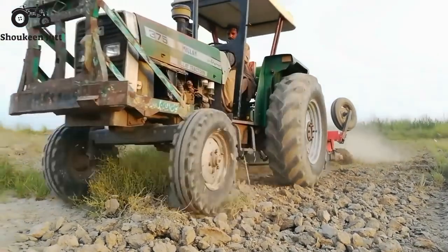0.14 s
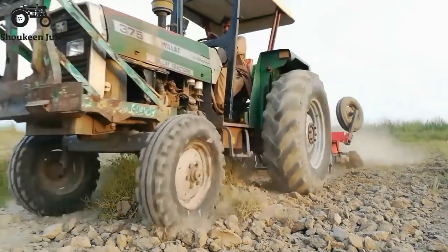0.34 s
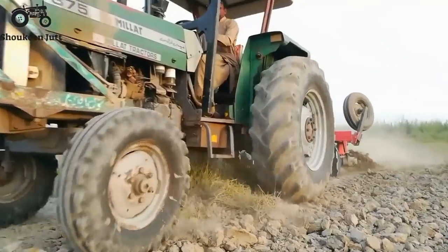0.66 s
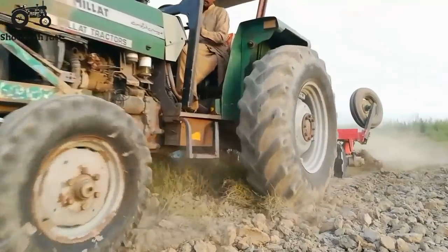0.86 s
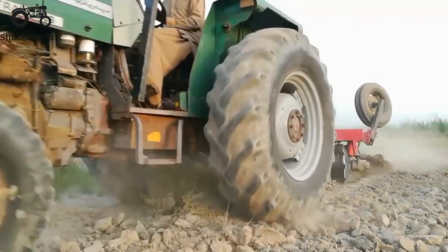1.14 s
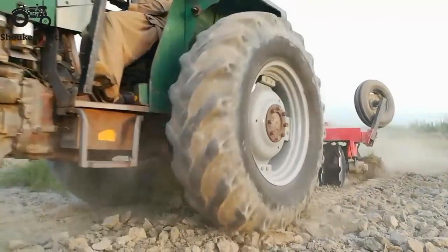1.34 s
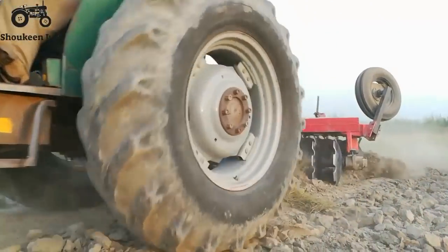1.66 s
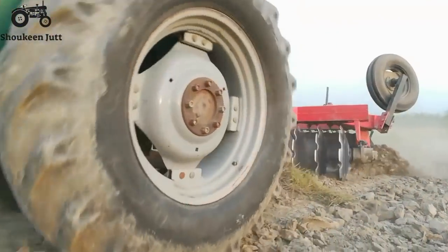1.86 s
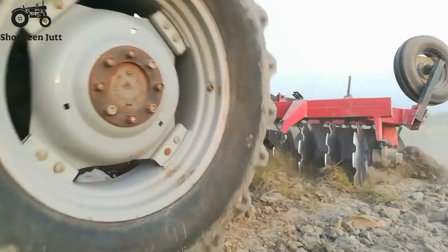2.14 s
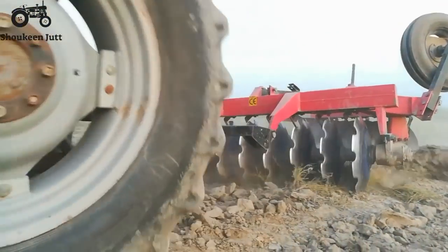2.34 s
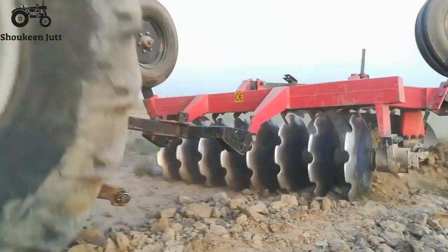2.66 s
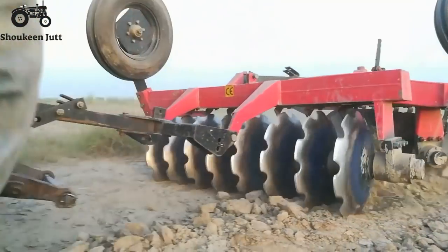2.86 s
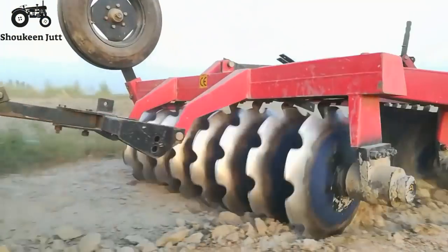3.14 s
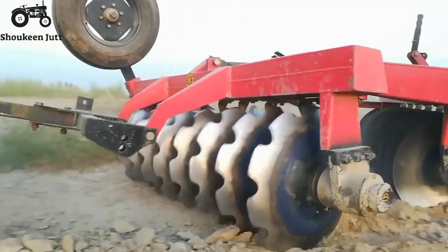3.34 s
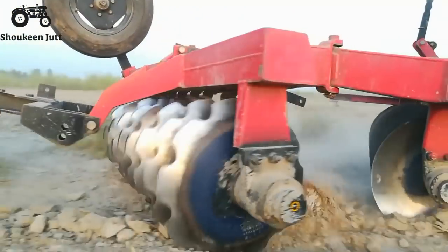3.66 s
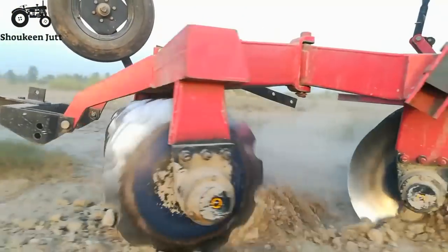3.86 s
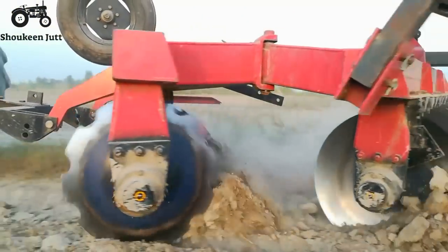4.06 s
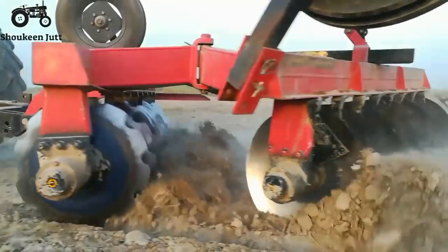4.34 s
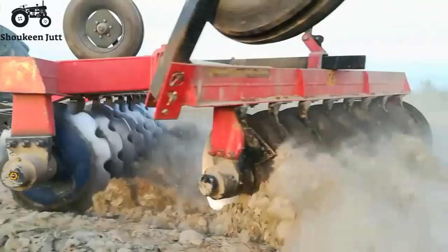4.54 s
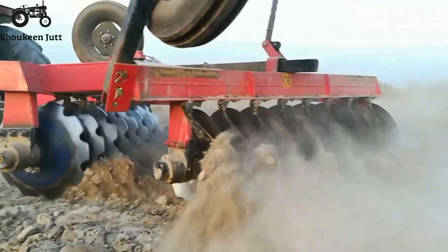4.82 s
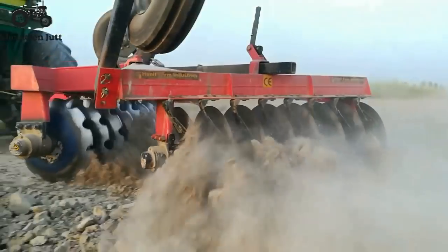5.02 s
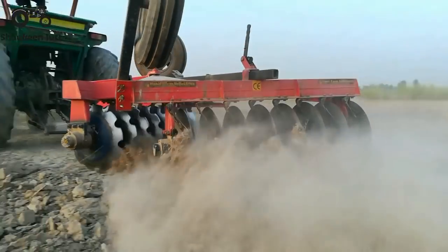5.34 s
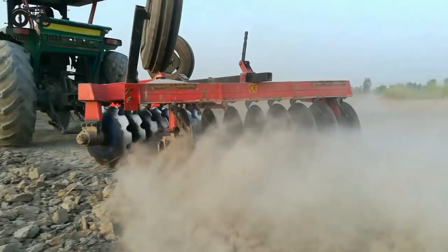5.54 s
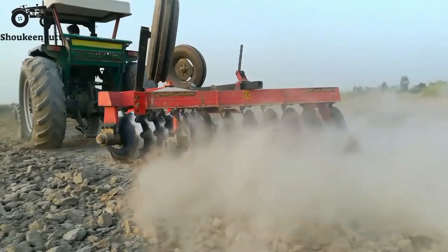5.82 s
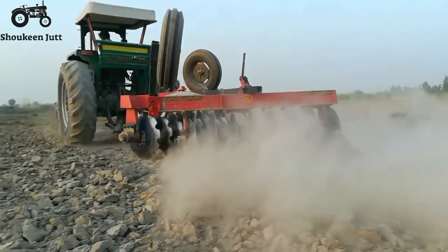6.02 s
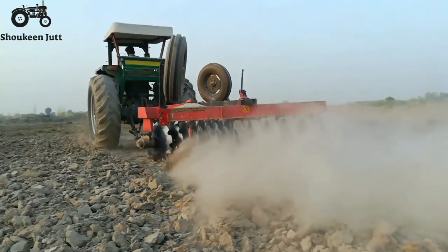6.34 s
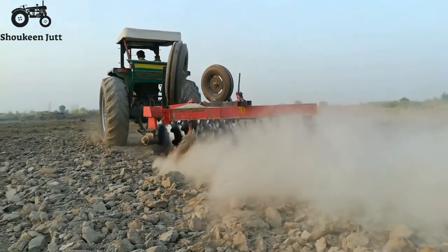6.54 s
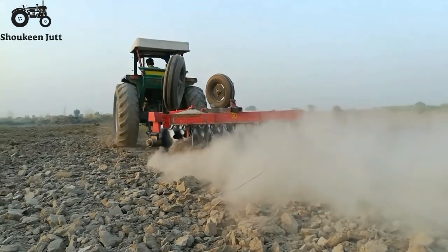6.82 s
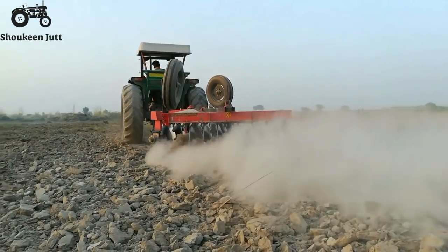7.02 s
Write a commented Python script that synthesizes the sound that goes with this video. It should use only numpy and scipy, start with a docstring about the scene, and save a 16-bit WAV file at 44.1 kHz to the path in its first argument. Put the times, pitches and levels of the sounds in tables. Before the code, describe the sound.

Open field, dry stony soil, close stereo microphone, no room echo. From 0 s a four-cylinder diesel runs at steady working speed, about 56 firings a second: low buzzing throb, hard metallic clatter, and a whine near 900 Hz, mostly left, swelling with load above a fainter, higher gear tone. The engine is nearest around 1 s, with a jolt at 0.9 and another at 1.6 as the rear wheel begins to mask it. Around 2 s the tyre crunches brittle grit, with soft thuds. At 2.67 a bright stone chink; from 2.9 discs ring, knock and scrape. Complete silence falls from 3.56 to 3.70, with abrupt edges. The harrow returns at its fullest from 3.7 to 5.2: rumbling earth, low clod thuds, grating steel, spraying grit, cracking stones. Brief thin squeaks come at 4.3 and 5.4-5.9. Engine and harrow recede, fading from 6.3 but still faintly audible at 7.2.

```python
"""On dry, stony soil a four-cylinder diesel tractor drives close by, towing a disc harrow, and moves off.
Exhaust lines, struck block panels and meshing gears all follow one wavering firing count.
Then tyre and harrow pass: noise bursts for crushed clods and grit, decaying modes for discs on stones,
sagging sines for heavy clods. A short silence splits the pass in two; the end fades."""
import sys
import numpy as np
from scipy import signal
from scipy.fft import rfft, irfft, next_fast_len
from scipy.io import wavfile
from scipy.ndimage import uniform_filter1d

SR = 44100
rng = np.random.default_rng(int(sys.argv[2]) if len(sys.argv) > 2 else 0)


def generate_wav(sig):
    """Save sig (samples, or channels by samples) to the path in sys.argv[1] as 16-bit PCM at SR."""
    pcm = np.round(np.clip(np.atleast_2d(sig).T, -1, 1) * 32767).astype(np.int16)
    wavfile.write(sys.argv[1], SR, pcm)


N = 317074
T = np.arange(N) / SR
SIZE = next_fast_len(N + 4096)
FREQS = np.maximum(np.arange(SIZE // 2 + 1) * SR / SIZE, 1)

# Half lengths below are those of a bell, out to 1/e.
# Engine speed. Each row: time in seconds, firings per second.
ENGINE_SPEED = [(0, 55.4), (.12, 55.3), (.29, 56.8), (.48, 55.45), (.68, 56.05), (.85, 56.0), (1.08, 56.8),
                (1.27, 55.85), (1.45, 55.65), (1.73, 56.5), (1.92, 55.7), (2.12, 56.0), (2.4, 55.5),
                (2.75, 55.9), (3.0, 55.5), (3.3, 57.1), (3.47, 55.75), (3.97, 57.4), (4.25, 55.65),
                (4.6, 56.05), (5.5, 55.9), (5.75, 56.6), (6.03, 54.95), (6.55, 56.6), (6.77, 54.9),
                (6.97, 56.05), (7.19, 55.0)]
START_FIRINGS = .38   # position within the first firing
# Side facing the listener. Each row: time in seconds, side (0 nose, 1 flank, 2 tail).
FACING = [(0, 0.018), (.4, 0.061), (.95, 0.48), (1.58, 0.72), (1.7, 0.86), (2.55, 1.25), (4.3, 1.535),
          (6.3, 1.68), (7.19, 1.75)]
# Positions of the three exhaust columns below on the scale of FACING.
EXHAUST_FACING = (.2, .62, 1.1)
# Exhaust lines. Each row: multiple of the firing rate, relative dB from the front, at a slant, from behind.
EXHAUST_ORDERS = [(.5, -26, -28, -23.5), (.75, -31, -32, -34), (1.25, -36, -37, -35),
                  (1.5, -36.5, -35, -32), (2, -13, -10.5, -9), (2.5, -15, -14, -14.5),
                  (3, -13.5, -18.5, -8), (3.5, -23, -28.5, -29), (4, -13, -12.5, -12.5),
                  (5, -19.5, -10.5, -11.5), (5.5, -20.5, -17.5, -28), (6, -21, -19.5, -18),
                  (6.5, -31, -25, -23), (12, -19.5, -29, -28.5), (13, -24, -29, -39.5)]
# Knock strength of each cylinder in firing order, in relative dB.
CYLINDERS_DB = [-1, 1, -1.5, 2.5]
# Clatter spectrum. Each row: frequency in Hz, relative dB at nose, flank, tail.
CLATTER_SPECTRUM = [(25, -15, -11, -8), (79.7, -4, -6, 2), (133, -2, -2.5, 5.5), (264, -5.5, -1, 1),
                    (478, -2, -3.5, -22), (766, -1.5, -3.5, -6), (1036, 5, -4, -2.5),
                    (1178, -4.5, -12.5, -10), (1480, -1.5, -7, 3.5), (2000, -10, 0, -9),
                    (2740, -7, -7.5, -16.5), (3430, -4, -10, -6), (5030, -14, -8, -16),
                    (6200, -14.5, -12.5, -17.5), (7350, -19, -19.5, -18.5), (14300, -30.5, -28.5, -41)]
# Ringing engine panels and the hollows between them.
# Each row: centre in Hz, width in Hz, change in dB at nose, flank, tail.
ENGINE_PANELS = [(365, 50, -2.5, -0.5, 5.5), (760, 78, 7, 2.5, -2), (795, 26, -21, -5.5, -3.5),
                 (1130, 50, 8, 5, -7), (1273, 90, -2.5, 1.5, 6), (1513, 250, 4, 4, -8.5),
                 (1890, 75, -5.5, -4.5, 0), (1922, 64, 12, 2.5, 9.5), (2367, 61, 8, 1.5, -16.5),
                 (2780, 150, -8, -3.5, 8.5), (3350, 98, -1, 3.5, -1.5), (3670, 160, 1.5, 4.5, -5.5),
                 (4160, 130, -8.5, 6.5, -6), (5450, 200, 5, -4, -2.5), (5830, 210, -2.5, -0.5, -11),
                 (6070, 350, 2.5, -2.5, 0), (6650, 300, 8, 3, -6), (7800, 250, -6, -2, 1)]
# Jolts over rough ground. Each row: centre in seconds, half length in seconds, rise of clatter in dB,
# rise of exhaust throb in dB.
JOLTS = [(.94, 0.031, 2, 3), (1.6, 0.018, 3, 4)]
GEAR_TEETH_PER_FIRING, TIMING_TEETH_PER_FIRING = 16, 24
# Gears take up load. Each row: centre in seconds, half length in seconds, rise of whine in dB.
GEAR_LOADS = [(.03, .07, 14), (.15, .06, 13.5), (.28, .05, 10), (.54, .14, 11.5), (.75, .16, 15.5),
              (.94, .11, 10.5), (1.05, .05, 3.5), (1.18, .07, 14), (1.32, .08, 11), (2.0, .06, 13.5),
              (2.17, .07, 11.5), (2.87, .1, 10), (3.04, .09, 14.5), (3.28, .1, 10.5), (3.46, .05, 15),
              (4.3, .08, 9.5), (4.5, .08, 12), (5.13, .1, 11), (5.42, .09, 11.5), (5.7, .12, 8),
              (6.05, .2, 11), (6.45, .17, 12.5), (6.78, .14, 12.5), (7.05, .14, 14)]
# Timing gears take up load. Each row: centre in seconds, half length in seconds, rise in dB.
TIMING_LOADS = [(.05, .13, 8), (.32, .08, 6), (.52, .07, 6), (.75, .08, 4), (1.38, .07, 7), (1.54, .06, 6)]

GROUND_SPEED_M_PER_S = 1.6
# Straight passes. Each holds: nearest moment in seconds, distance then in metres, relative level then in dB.
EXHAUST_PASS = (0.76, 1.82, -18.5)
BLOCK_PASS = (1.27, 2.54, -14.5)
GEAR_PASS = (0.76, 2.2, -37)
TIMING_PASS = (0.56, 4.3, -35.5)
CLODS_PASS = (4.25, 0.93, -25.5)
FRONT_GANG_PASS = (3.53, 0.74, -26.5)
REAR_GANG_PASS = (5, 1.08, -28)
GRIT_PASS = (5.1, 1.29, -31.5)
# Rear wheel hides the engine: midpoint in seconds, duration of the change in seconds, loss in dB.
WHEEL_SCREEN = (1.564, .08, 1)
# Harrow comes out from behind the wheel: fully out in seconds, duration in seconds, loss before in dB.
HARROW_CLEAR = (2.37, 0.84, 11)

# Clod spectrum. Each row: frequency in Hz, relative level per Hz in dB.
CLOD_SPECTRUM = [(40, -12.5), (110, -20), (170, -1.5), (290, -1), (370, 0), (480, -8), (800, -18),
                 (1500, -43)]
# Grit spectrum. Each row: frequency in Hz, relative level per Hz in dB.
GRIT_SPECTRUM = [(600, -9.5), (1000, -11), (1200, -3), (1900, 5.5), (2400, -1.5), (2900, -3), (3200, 3),
                 (3850, 4.5), (4400, 0.5), (5050, -3), (5600, -7.5), (6500, -7), (8000, -13), (15500, -21)]
# Rumble of earth turning between the discs. Each row: time in seconds, centre in Hz, dB relative to the clods.
HOLLOW = [(2.7, 176, -1), (3.4, 185, -2), (3.8, 270, -13), (4.6, 290, -8.5), (5.1, 360, -0.5),
          (5.6, 365, -3.5), (6.2, 319, -8.5), (6.5, 171.3, 0)]
# Loose earth slides off the discs. Each row: centre in seconds, half length in seconds, rise of rumble in dB.
CLOD_FALLS = [(3.52, 0.073, 0.5), (3.78, 0.087, 1), (4.05, 0.049, 5), (4.24, 0.045, 2.5),
              (4.36, 0.022, 5.5), (4.52, 0.087, 2), (4.66, 0.025, 4.5), (4.79, 0.061, 4), (5.13, 0.11, 2),
              (5.5, 0.036, 4), (5.78, 0.14, 3)]
# Stony patches drag along the discs. Each row: centre in seconds, half length in seconds,
# rise of ringing in dB, rise of grit in dB.
SCRAPES = [(2.8, 0.038, 2, -3), (2.9, 0.024, 9, 3), (3.16, 0.044, 6, 12.5), (3.28, 0.061, 5, 12),
           (3.40, 0.092, 3.5, 4.5), (3.53, 0.026, 2, 15.5), (3.77, 0.048, 2.5, 9), (3.94, 0.046, 7, 9),
           (4.05, 0.04, 7, -1), (4.47, .06, 3, 7.5), (4.59, 0.064, 3, 5), (4.72, 0.052, 1, -3.5),
           (5.0, 0.11, 1, 2.5), (5.13, 0.035, 2.5, 3), (5.4, 0.028, 7.5, 8), (5.55, 0.086, 2.5, 6.5),
           (5.76, 0.078, 4.5, 5.5), (5.96, 0.074, 2.5, 8.5), (6.15, 0.022, 5.5, 5.5), (6.22, 0.033, 7, 6),
           (6.33, 0.025, 8.5, 5.5), (6.47, 0.018, 2, 4), (6.54, .02, 6.5, 1), (6.9, .025, 3, 4)]
# Ringing of the disc rims. Each row: time in seconds, centre in Hz, relative level in dB.
RIM_RINGING = [(3.0, 1580, -7), (3.4, 1520, -8), (3.8, 1470, -8.5), (4.6, 1550, -5.5), (5.0, 1510, -9),
               (5.25, 1400, -7), (5.8, 1420, -9), (6.4, 1440, -7.5)]
# The rear gang takes over. Each row: time in seconds, its share 0-1.
REAR_GANG_SHARE = [(4.4, 0), (5.3, 0.92)]
# Steel discs and frame. Each row: mode in Hz, relative dB in the front gang, in the rear gang, t60 in seconds.
DISC_MODES = [(490, -8.5, -26.5, .05), (922, 1, -4.5, 0.058), (1048, 4.5, -25, 0.027),
              (1310, -9.5, -10, 0.1), (1351, -5, 2, 0.084), (1416, 2.5, -7.5, 0.074),
              (1494, -20, 0.5, 0.091), (1529, 0.5, 3, 0.072), (1632, 5, -18.5, 0.045),
              (1797, 1, 1.5, 0.034), (1890, -8, -2.5, 0.1), (2143, -11.5, -6.5, 0.062),
              (2510, -8.5, -7, 0.065), (3160, -11.5, -5.5, 0.14), (3584, -7, -5.5, 0.11),
              (3860, -15, -5.5, .04), (4040, -24, -6, 0.047), (4500, -11.5, -7.5, .04),
              (4640, -8, -7.5, .04), (4970, -11, -8.5, 0.043)]
# Discs hit large stones. Each row: start in seconds, relative level in dB.
STONE_KNOCKS = [(2.899, -6.5), (3.079, -11), (3.1173, -2.5), (3.258, -12), (3.296, -18), (3.3344, -7.5),
                (3.3831, -7), (3.4718, -14.5), (3.757, -8), (4.015, -15), (4.03, -16), (4.057, -7.5),
                (4.184, -9.5), (4.35, -9.5), (4.5384, -13.5), (4.6034, -15), (4.8628, -12), (4.9167, -20),
                (5.011, -13), (5.0699, -9), (5.1393, -13), (5.225, -11), (5.3862, -15), (5.4874, -11.5),
                (5.5956, -18.5), (5.881, -14.5), (6.0616, -12), (6.1768, -16)]
# Rear tyre rolls by: nearest moment in seconds, half length in seconds, relative level in dB.
TYRE_CRUNCH = (1.95, .6, -31)
# Tyre crunch spectrum. Each row: frequency in Hz, relative level per Hz in dB.
CRUNCH_SPECTRUM = [(1000, -20), (2050, 2), (2800, -17), (4400, -4), (5000, 5), (5500, 9), (5950, -12),
                   (6650, 1), (7400, -8), (15000, -18)]
# Heavy clods land or burst under a wheel. Each row: start in seconds, relative level in dB, settled pitch in Hz.
CLOD_THUDS = [(1.598, -18, 152), (2.099, -18, 179), (2.37, -18.5, 185), (3.747, -25, 288),
              (3.778, -20, 190), (3.905, -23, 235), (3.998, -19.5, 223), (4.048, -15.5, 318),
              (4.08, -24, 198), (4.23, -19.5, 262), (4.302, -22, 276), (4.343, -25, 339), (4.466, -23, 221),
              (4.648, -19, 268), (4.737, -18, 320), (4.849, -18, 252), (4.933, -19, 285),
              (5.006, -17.5, 355), (5.091, -18.5, 318), (5.134, -18, 347), (5.183, -18, 205),
              (5.782, -23, 166), (6.643, -24, 196)]
# A stone skips along the drawbar. Each row: touch in seconds, relative level in dB.
DRAWBAR_TOUCHES = [(2.6667, -0.5), (2.668, -2), (2.672, -1), (2.6775, -4), (2.683, -5)]
# Drawbar modes. Each row: frequency in Hz, relative level in dB, t60 in seconds.
DRAWBAR_MODES = [(3120, 4, 0.023), (4620, 0, .025), (6300, 0.5, 0.027), (6900, 0.5, .03),
                 (7350, -0.5, .025), (7900, -4, .02), (8450, -1.5, 0.034), (9300, -6, .02)]
# Stones crack or are flicked aside. Each row: start in seconds, relative level in dB, centre in Hz, t60 in seconds.
STONE_CRACKS = [(2.668, -25, 7400, 0.06), (2.667, -22, 3600, .04), (2.898, -20.5, 1900, .06),
                (3.119, -19.5, 1920, 0.06), (3.379, -26, 6200, .06), (4.404, -29, 6990, 0.041),
                (4.537, -31, 6850, 0.054), (5.079, -25, 4500, 0.098), (5.366, -23.5, 3860, 0.05),
                (5.752, -27, 3700, .06), (5.918, -27, 3300, 0.076), (6.013, -30, 3300, .07),
                (6.207, -34, 3870, .05), (6.267, -27, 3400, .04)]
# Thin steel squeaks. Each row: centre in seconds, half length in seconds, pitch in Hz, level in dB.
SQUEAKS = [(4.305, .035, 3590, -35), (5.37, .02, 3580, -30), (5.49, .03, 3580, -33), (5.57, .04, 3590, -29),
           (5.76, .04, 3620, -34), (5.85, .022, 12500, -46)]

# Two microphone ports. Each row: frequency in Hz, left-right likeness 0-1, left minus right in dB,
# left lead in ms at off_axis 1.
PORTS = [(100, 0.93, -1, 0.77), (336, 0.89, 1, 0.75), (495, 0.83, 4, 0.76), (683, 1, 9, 0.62),
         (920, 0.59, 9.5, 0.65), (1170, 0.99, 3.5, 0.69), (1450, 0.435, 4.5, 0.63), (1875, 0.42, 7, 0.39),
         (2140, 0.33, 4.5, 0.49), (2720, 0.12, -1.5, 0.54), (3580, 0.36, 1.5, 0.593),
         (4560, 0.3, 12.5, 0.619), (5530, 0.073, 2.5, 0.558), (6100, .1, 5.5, 0.562),
         (8100, 0.12, -0.5, 0.57), (14900, 0.054, -1.5, 0.55)]
# Silence: start in seconds, end in seconds.
SILENCE = (3.563, 3.700)
CUTOFF_HZ = 15900
FADE_END_S, FADE_S = 7.61, 1.27   # when the fade would reach silence, its full length


def from_db(db):
    """Decibels to gain."""
    return 10 ** (np.asarray(db) / 20)


def rms_one(x):
    """Scale to rms 1."""
    return x / np.sqrt(np.mean(x ** 2) + 1e-20)


def in_time(rows):
    """Each column of a curve at every sample."""
    s, *columns = np.transpose(rows)
    return [np.interp(T, s, c) for c in columns]


def in_frequency(rows):
    """Each column of a spectrum at every frequency, interpolated over log Hz."""
    hz, *columns = np.transpose(rows)
    return [np.interp(np.log(FREQS), np.log(hz), c) for c in columns]


def coloured(x, curve_db):
    """Give a sound a spectrum; rms 1."""
    return rms_one(irfft(rfft(x, SIZE) * from_db(curve_db), SIZE)[..., :N])


def lowpass_db(corner_hz):
    """Smooth roll-off in dB for slow random signals."""
    return -20 * np.log10(1 + (FREQS / corner_hz) ** 2)


def drift(corner_hz):
    """Slow random wander of rms 1."""
    return coloured(rng.standard_normal(N), lowpass_db(corner_hz))


def decay(clicks, t60_s):
    """Each click leaves an exponential tail."""
    return signal.lfilter([1], [1, -from_db(-60 / (t60_s * SR))], clicks + 1e-18)


def ring(clicks, hz, t60_s):
    """Two-pole resonator: a unit click starts a dying sine of height 1."""
    r = from_db(-60 / (t60_s * SR))
    w = 2 * np.pi * hz / SR
    return signal.lfilter([0, np.sin(w)], [1, -2 * r * np.cos(w), r * r], clicks + 1e-18)


def grains(per_s, spread_db):
    """Random contacts of uneven strength."""
    contacts = rng.random(N) < per_s / SR
    return contacts * from_db(spread_db * np.minimum(rng.exponential(1, N), 4))


def passing(nearest_s, distance_m, level_db):
    """Level in dB of a part driving by in a straight line: pressure falls as one over distance."""
    along_m = GROUND_SPEED_M_PER_S * (T - nearest_s)
    return level_db - 10 * np.log10(1 + (along_m / distance_m) ** 2)


def swells(rows):
    """Bell-shaped rises in dB, one curve for each level column of the events."""
    return sum(np.outer(db, np.exp(-((T - s) / half_s) ** 2)) for s, half_s, *db in rows)


def behind_wheel():
    """Share of the engine hidden by the rear wheel, 0-1."""
    middle_s, duration_s, _ = WHEEL_SCREEN
    return np.clip((T - middle_s) / duration_s + .5, 0, 1)


def screened():
    """Change of the engine's level in dB as the rear wheel hides it."""
    return -WHEEL_SCREEN[2] * behind_wheel()


def ports(pair, off_axis):
    """Mix two unrelated versions into left and right, with likeness, balance and lead set by frequency."""
    alike, balance_db, lead_ms = in_frequency(PORTS)
    alike, tilt = np.clip(alike, 0, 1), from_db(balance_db)
    common, apart = rfft(pair, SIZE) * np.sqrt([1 + alike, 1 - alike])
    lead = np.exp(2j * np.pi * FREQS * off_axis * lead_ms / 1000)
    left = (common + apart) * tilt * lead
    right = common - apart
    return irfft(np.array([left, right]) / np.sqrt(1 + tilt ** 2), SIZE)[:, :N]


def exhaust(firings, waver_db, smear_rad):
    """Pressure pulses smeared by the silencer; unequal cylinders add lines between the harmonics."""
    level_db = passing(*EXHAUST_PASS) + screened() + swells(JOLTS)[1]
    facing, = in_time(FACING)
    out = from_db(.5 * drift(3.4)) * np.cos(2 * np.pi * firings)
    for order, *sides_db in EXHAUST_ORDERS:
        shake_rad = .12 * drift(6)
        phase = 2 * np.pi * order * firings - smear_rad * (order - 1) ** 2 + shake_rad
        line_db = np.interp(facing, EXHAUST_FACING, sides_db) + waver_db * drift(2.0)
        out = out + from_db(line_db) * np.cos(phase)
    return np.sqrt(2) * from_db(level_db) * out


def valve_gear(firings, count, spread_db, jitter_s, tap_s):
    """Taps of fixed colour return at the same crank angles in every round of four firings; rms 1."""
    out = np.zeros((2, N))
    rounds = np.arange(0, firings[-1], 4)
    span = np.arange(int(4 * tap_s * SR))
    for angle in (np.arange(count) + rng.random(count)) / count * 4:   # in firings
        tap = rng.standard_normal((2, 1, len(span))) * np.exp(-span / (tap_s * SR))
        s = np.interp(rounds + angle, firings, T) + jitter_s * rng.standard_normal(len(rounds))
        s = s[(s > 0) & (s < T[-1] - .01), None]
        strength = from_db(spread_db * rng.uniform(-0.81, 1, s.shape))
        out[:, (s * SR).astype(int) + span] += tap * strength
    return rms_one(out)


def clatter(firings, knock, knock_t60_s, tick, tick_t60_s, uneven_db):
    """Combustion knocks the block, valves and injectors tap between, the fan rushes underneath."""
    stroke = np.floor(firings + .5).astype(int)   # the knock leads the exhaust pulse
    fired = np.diff(stroke, prepend=0) > 0
    cylinder_db = np.take(CYLINDERS_DB, stroke, mode="wrap")
    blows = decay(fired * from_db(cylinder_db + uneven_db * rng.standard_normal(N)), knock_t60_s)
    blows = uniform_filter1d(blows, size=33)   # the knock spreads through the block in under a millisecond
    ticks = decay(grains(per_s=240, spread_db=2.5), tick_t60_s)
    force = np.sqrt(1 + (knock * blows) ** 2 + (tick * ticks) ** 2)   # the 1 is the fan
    taps = valve_gear(firings, count=72, spread_db=2.5, jitter_s=.00008, tap_s=.0005)
    shaking = force * (.78 * rng.standard_normal((2, N)) + .62 * taps)
    level = from_db(passing(*BLOCK_PASS) + screened() + swells(JOLTS)[0])
    facing, = in_time(FACING)
    sides = []
    for k, colour_db in enumerate(in_frequency(CLATTER_SPECTRUM)):
        panels_db = sum(db[k] / (1 + (2 * (FREQS - hz) / width_hz) ** 2)
                        for hz, width_hz, *db in ENGINE_PANELS)
        seen = np.clip(1 - abs(facing - k), 0, 1) ** 0.98
        source = shaking if k < 2 else force * rng.standard_normal((2, N))   # no taps at the tail
        sides.append(seen * level * coloured(source, colour_db + panels_db))
    nose, flank, tail = sides
    return ports(nose + flank, off_axis=0.934) + ports(tail, off_axis=.15)


def whine(firings, left_db, right_db, rough_rad):
    """A gear mesh sings in step with the engine, louder under load, shaken by backlash."""
    level_db = passing(*GEAR_PASS) + swells(GEAR_LOADS)[0]
    phase = 2 * np.pi * GEAR_TEETH_PER_FIRING * firings + rough_rad * drift(33)
    return from_db(level_db + np.array([[left_db], [right_db]])) * np.sin([phase + 0.94, phase])


def timing_gear(firings, waver_db, hidden_db):
    """A thinner mesh tone a fifth above the whine, weaker behind the rear wheel."""
    phase = 2 * np.pi * TIMING_TEETH_PER_FIRING * firings + 0.29 * drift(30)
    level_db = passing(*TIMING_PASS) + swells(TIMING_LOADS)[0] + waver_db * drift(13)
    return from_db(level_db + hidden_db * behind_wheel()) * np.sin(phase)


def soil(spectrum, per_s, spread_db, t60_s):
    """Breaking earth: each fragment is a short burst of noise; rms 1."""
    power = decay(grains(per_s, spread_db) ** 2, t60_s / 2)
    return coloured(np.sqrt(power) * rng.standard_normal((2, N)), in_frequency(spectrum)[0])


def hollow(width_hz):
    """A noise band whose centre shifts as the furrow fills and empties."""
    hz, level_db = in_time(HOLLOW)
    slow = coloured(rng.standard_normal((2, 2, N)), lowpass_db(width_hz))
    phase = 2 * np.pi * np.cumsum(hz) / SR
    return from_db(level_db) * (slow[0] * np.cos(phase) + slow[1] * np.sin(phase))


def rim(per_s, spread_db, t60_s):
    """Stones grate on the disc rims; the ringing shifts as the discs sink in and lift."""
    hz, level_db = in_time(RIM_RINGING)
    random_phase = np.exp(2j * np.pi * rng.random((2, N)))
    strikes = decay(grains(per_s, spread_db) * random_phase, t60_s)
    carrier = np.exp(2j * np.pi * np.cumsum(hz) / SR)
    return from_db(level_db) * rms_one((strikes * carrier).real)


def discs(level_db, knock_db):
    """Small stones rattle on the discs, large ones knock; each touch weights the modes anew."""
    rear = np.clip(in_time(REAR_GANG_SHARE)[0], 0, 1)
    strength = grains(per_s=900, spread_db=1.2)
    at = np.flatnonzero(strength)
    s, db = np.transpose(STONE_KNOCKS)
    knocks_at = (s * SR).astype(int)
    touches, knocks = np.zeros((2, N)), np.zeros((2, N))
    rattle, knocked = 0, 0
    for hz, front_db, rear_db, t60_s in DISC_MODES:
        gain = from_db(front_db) * (1 - rear) + from_db(rear_db) * rear
        touches[:, at] = strength[at] * rng.standard_normal((2, len(at)))
        rattle = rattle + gain * ring(touches, hz, t60_s)
        height = from_db(db + knock_db + 2 * rng.standard_normal(len(s)))
        knocks[:, knocks_at] = height * rng.choice([-1, 1], (2, len(s)))
        knocked = knocked + gain * ring(knocks, hz, t60_s)
    grating = 1.3 * rim(per_s=110, spread_db=1.5, t60_s=.08)
    return from_db(level_db) * (rms_one(rattle) + grating) + knocked


def tyre():
    """The lugs of the rear tyre crush dry clods in uneven, gritty surges."""
    s, half_s, level_db = TYRE_CRUNCH
    surges_db = 2.5 * drift(14)
    crunch = soil(CRUNCH_SPECTRUM, per_s=700, spread_db=3, t60_s=.012)
    bell = np.exp(-((T - s) / half_s) ** 2)
    return ports(from_db(level_db + surges_db) * bell * crunch, off_axis=.95)


def thuds(rise_s, sag):
    """A heavy clod lands softly and booms for a few cycles, sinking in pitch."""
    out = np.zeros(N)
    for s, db, hz in CLOD_THUDS:
        start = int(s * SR)
        t = T[:min(N - start, SR // 5)]
        phase = 2 * np.pi * hz * (t + sag * rise_s * (1 - np.exp(-t / rise_s)))
        swell = t / rise_s * np.exp(1 - t / rise_s)
        out[start:start + len(t)] += from_db(db) * swell * np.sin(phase)
    return out * [[1], [0]]   # only the part common to both ports


def chink(level_db):
    """A stone skips along a steel part: a quick run of touches into a few bright modes."""
    s, db = np.transpose(DRAWBAR_TOUCHES)
    out = np.zeros((2, N))
    start = int(s[0] * SR)
    for hz, mode_db, t60_s in DRAWBAR_MODES:
        clicks = np.zeros((2, SR // 5))
        signs = rng.choice([-1, 1], (2, len(s)))
        clicks[:, (s * SR).astype(int) - start] = from_db(level_db + db + mode_db) * signs
        out[:, start:start + SR // 5] += ring(clicks, hz, t60_s)
    return out


def cracks():
    """Stones snap with a bright, quickly dying crunch of band-passed noise."""
    out = np.zeros((2, N))
    for s, db, hz, t60_s in STONE_CRACKS:
        band = signal.butter(2, [hz * .74, hz * 1.36], "band", fs=SR, output="sos")
        burst = decay(1. * (np.arange(N) == int(s * SR)), t60_s)
        out += from_db(db) * burst * rms_one(signal.sosfilt(band, rng.standard_normal((2, N))))
    return out


def squeak():
    """Steel slips on steel for a moment: a sine with wandering phase."""
    out = np.zeros(N)
    for s, half_s, hz, db in SQUEAKS:
        bell = np.exp(-((T - s) / half_s) ** 2)
        out += from_db(db) * bell * np.sin(2 * np.pi * hz * T + 0.81 * drift(45))
    return out


def harrow():
    """The discs lift clods, ring against stones and throw grit; each sound follows its own pass."""
    clear_s, duration_s, loss_db = HARROW_CLEAR
    hidden_db = -loss_db * np.clip((clear_s - T) / duration_s, 0, 1)
    falls_db, = swells(CLOD_FALLS)
    ringing_db, spray_db = swells(SCRAPES)
    earth = soil(CLOD_SPECTRUM, per_s=150, spread_db=1.0, t60_s=0.056) + hollow(width_hz=12)
    clods = from_db(passing(*CLODS_PASS) + hidden_db + falls_db) * earth
    pebbles = .5 * soil(GRIT_SPECTRUM, per_s=300, spread_db=2.2, t60_s=.012)
    spray = 0.83 * soil(GRIT_SPECTRUM, per_s=1900, spread_db=-3.5, t60_s=0.048)
    grit = from_db(passing(*GRIT_PASS) + hidden_db + spray_db) * (pebbles + spray)
    gangs_db = np.maximum(passing(*FRONT_GANG_PASS), passing(*REAR_GANG_PASS))
    steel = discs(gangs_db + hidden_db + ringing_db + 0.4, knock_db=-14.5)
    stones = cracks() + chink(level_db=-21.5)
    return ports(clods + thuds(rise_s=0.01, sag=0.16) + grit + steel + stones, off_axis=0.99) + squeak()


def scene():
    """One firing count drives exhaust, clatter and gears; tyre and harrow are added."""
    firings = START_FIRINGS + np.cumsum(in_time(ENGINE_SPEED)[0]) / SR
    throb = exhaust(firings, waver_db=1.0, smear_rad=0.352)
    block = clatter(firings, knock=.98, knock_t60_s=.05, tick=.3, tick_t60_s=.02, uneven_db=.5)
    gears = whine(firings, left_db=4.5, right_db=-16.0, rough_rad=0.12)
    timing = timing_gear(firings, waver_db=2.2, hidden_db=-9)
    return throb + block + gears + timing + tyre() + harrow()


def record(dry):
    """Clip the peaks, mute for a moment, fade the end and cut the top."""
    live = (T < SILENCE[0]) | (T >= SILENCE[1])
    fade = np.clip((FADE_END_S - T) / FADE_S, 0, 1)
    top_cut = signal.ellip(12, .1, 90, CUTOFF_HZ, fs=SR, output="sos")
    return signal.sosfilt(top_cut, np.clip(dry, -.88, .88) * live * fade)


dry = scene()
out = record(dry)
generate_wav(out)
```